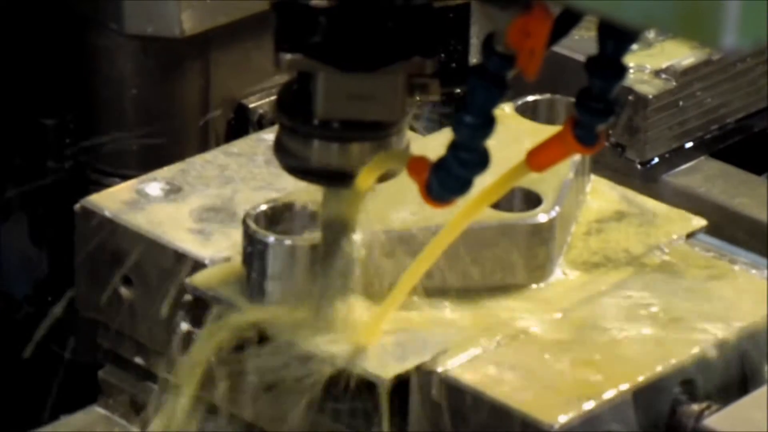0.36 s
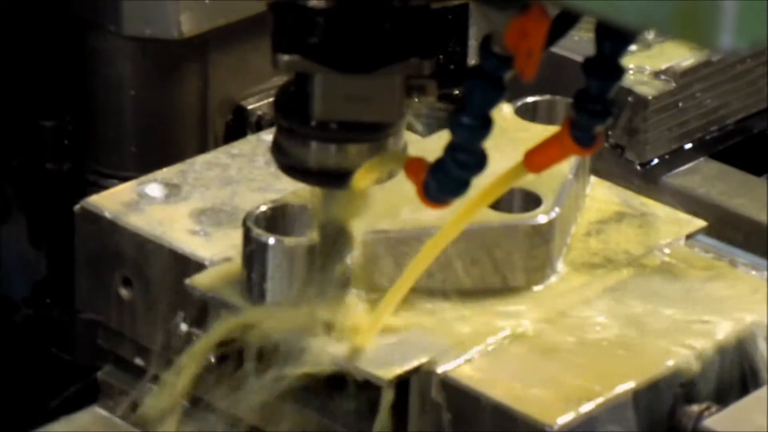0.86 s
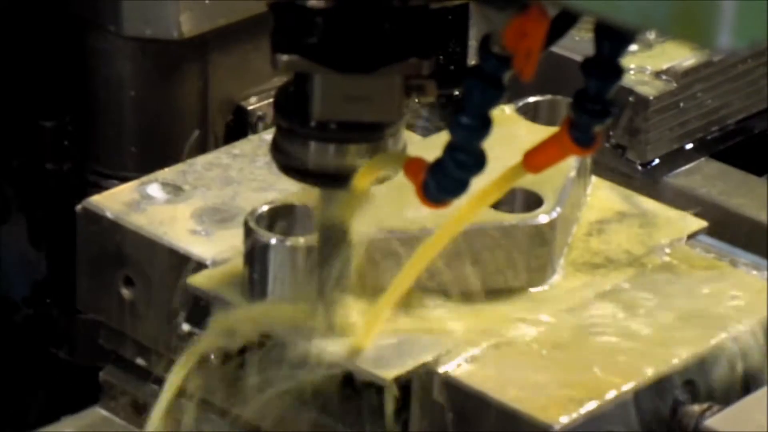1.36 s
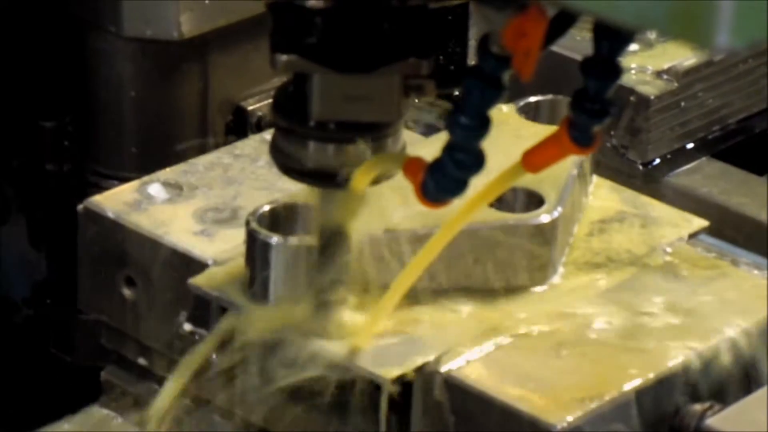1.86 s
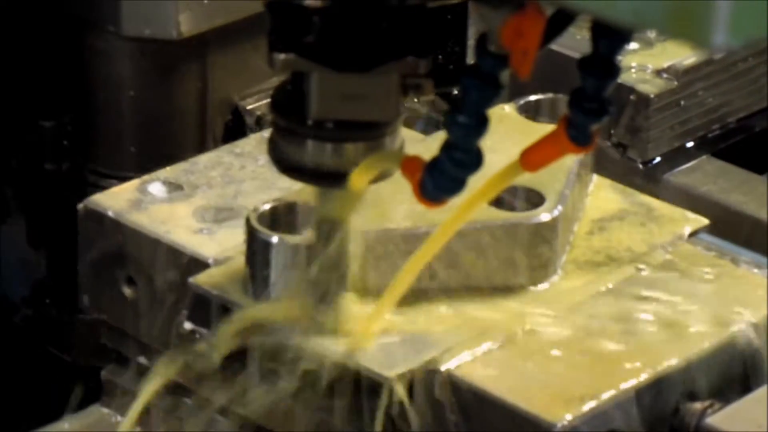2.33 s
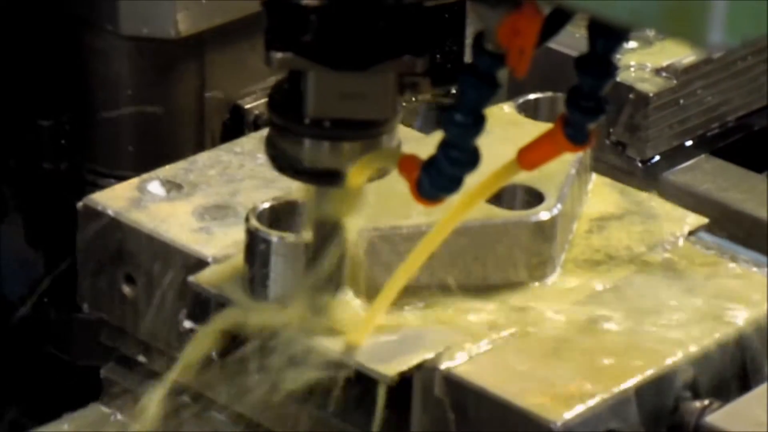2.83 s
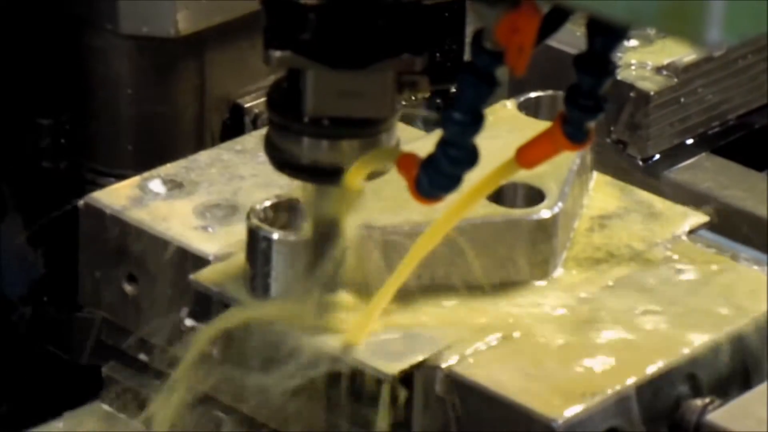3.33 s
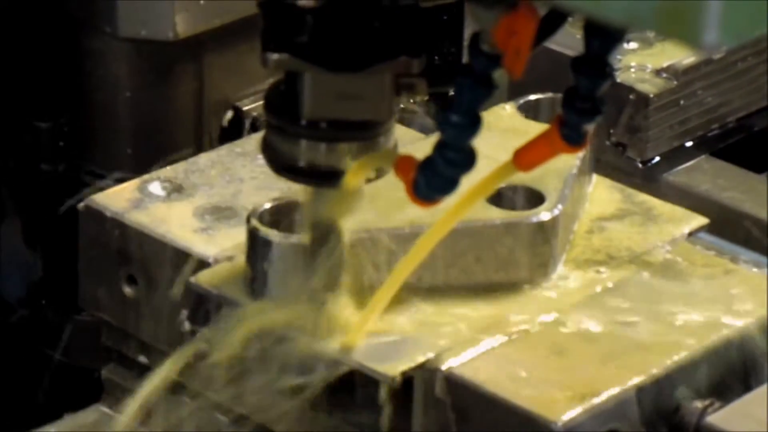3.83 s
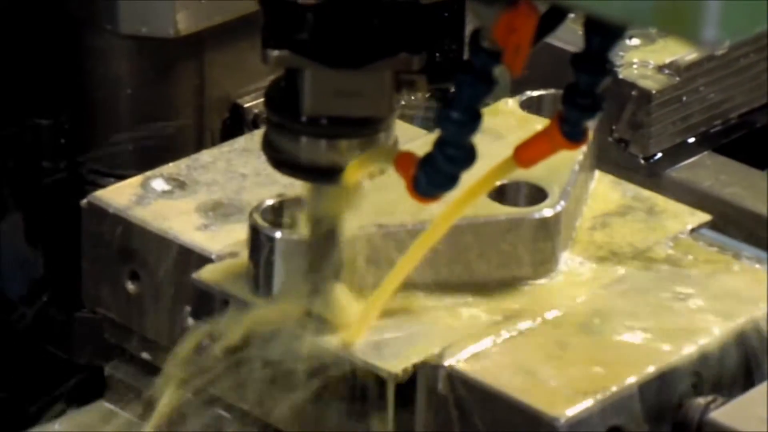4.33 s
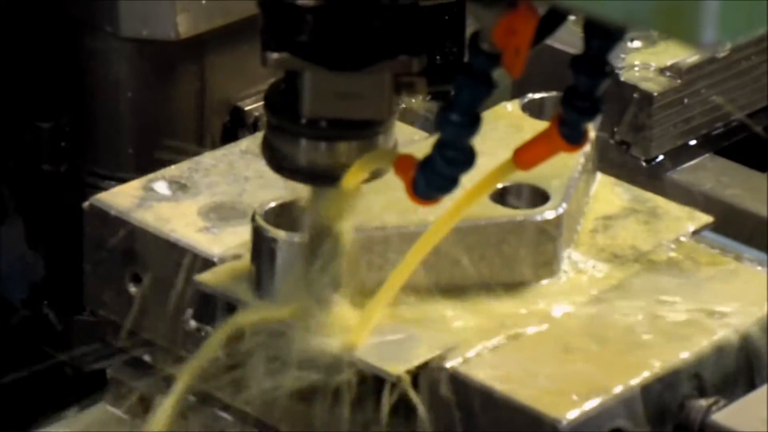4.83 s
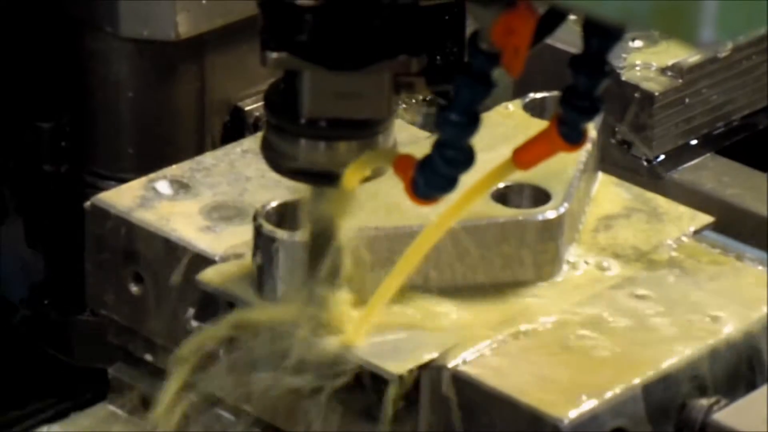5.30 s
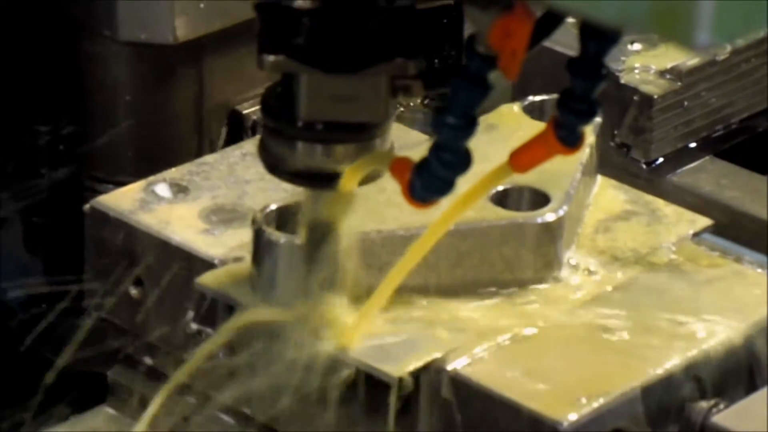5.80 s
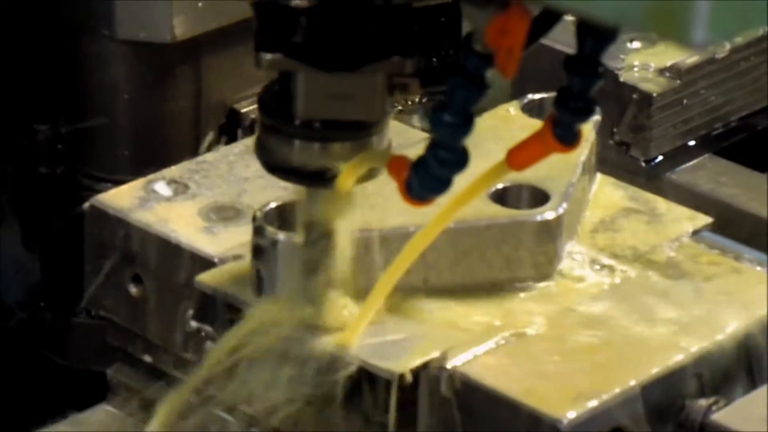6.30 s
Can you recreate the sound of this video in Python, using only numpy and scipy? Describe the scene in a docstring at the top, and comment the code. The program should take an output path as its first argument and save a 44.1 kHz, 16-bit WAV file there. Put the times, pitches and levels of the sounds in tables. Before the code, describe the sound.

From 0 s a milling machine is already in full cut, heard close in stereo through its open guard. A dense, bright coolant hiss, strongest around 7 to 9 kHz, spreads wide off sheet-metal walls, its colour shifting slowly. In the centre, spindle, pump and motor tones form a low hum and thin midrange whines near 1 kHz, over a broad mechanical whir. The cutter rings roughly between 900 and 1900 Hz, fluttering about 42 times a second with a weaker ten-per-second turn. Tiny metallic bites, each around a hundredth of a second, are crowded and strongest from 0.2 to 0.6 s, then scattered, with clearer ones near 1.6, 2.0, 2.85 and 4.4 s. Loudness creeps upward, slipping down a small step near 1.1, 2.1, 4.4 and 6.1 s. Around 5.7 s a faint short tone near 1070 Hz swells and fades; cutting continues to about 6.7 s.

```python
"""A four-flute cutter mills a metal block under a jet of coolant, heard through the machine's open guard.
From the start the spindle hums in multiples of its turn, pump and motors add steady tones, the turning
flutes ring the tool and fixture, the machine whirs, and coolant hisses off the sheet-metal walls.
Soon, and all the way through, single bites ring out; near the end a short tone rises and fades.
The whole level creeps up and now and then sinks a step."""
import sys
import numpy as np
from scipy import signal
from scipy.fft import rfft, irfft
from scipy.io import wavfile
from scipy.ndimage import uniform_filter1d

SR = 44100
rng = np.random.default_rng(int(sys.argv[2]) if len(sys.argv) > 2 else 0)


def how_loud(loudness_db):
    """Turn decibels into a plain amplitude multiplier (0 dB gives 1, 20 dB gives 10)."""
    steps = np.asarray(loudness_db, float) / 20
    return 10 ** steps


def output_pcm(signal):
    """Save a mono or channel-first signal as 16-bit PCM at the path in sys.argv[1].

    Samples are clipped to [-1, 1] before scaling.
    """
    pcm = np.clip(np.atleast_2d(signal).T, -1, 1) * 32767
    wavfile.write(sys.argv[1], SR, np.round(pcm).astype(np.int16))


N = 294147

TURNS_PER_S, FLUTES = 10.4035, 4
FIRST_BITE_TURNS = .2  # where a flute bites, in turns after the start

# tones locked to the spindle, before they waver: multiple_of_turn, rms_db
SPINDLE_TONES = [(7, -56), (8, -48), (10, -56), (12, -43), (14, -46), (16, -45), (20, -50), (22, -56),
                 (25, -56), (32, -52), (36, -57), (39, -55), (56, -55), (84, -47), (87, -52), (88, -42),
                 (90, -46), (91, -45), (92, -41), (93, -47), (109, -50), (132, -52), (144, -53), (147, -51)]
# steady tones of mains, pump and motors, before they waver: pitch_hz, rms_db
MOTOR_TONES = [(49.96, -55), (64.18, -50), (95.9, -55), (99.91, -52), (149.85, -51), (186.27, -50),
               (222.4, -50), (287.67, -52), (372.56, -51), (407.55, -52), (444.77, -48), (667.17, -51),
               (979.95, -41), (1021.5, -52)]
# ringing modes of tool and fixture; the cutting force rotates, so each is pushed hardest at its own angle:
# pitch_hz, width_hz, angle_turns, turn_swing_db, flute_swing_db, unevenness_db
TOOL_MODES = [(930, 110, .22, .6, 1.5, .3), (1447, 65, .42, 1.5, 2.5, .8), (1860, 90, .52, 2.2, 2.8, 1.8)]
# basic level of each tool mode, low to high: rms_db
RING_DB = (-35, -34.5, -35.5)
# how far each mode follows the load, low to high: share (no unit)
LOAD_FOLLOW = (1.4, 0.53, .8)
# slow change of each mode's ring from start to end, low to high: change_db
SLOW_CHANGE_DB = (1, -1.5, -2.5)
# how hard the tool is loaded: time_s, load_db
LOAD = [(0, 5), (.15, -3), (.7, 0.5), (1.3, 0), (1.8, 1.5), (2.4, -2), (3.0, 0.5), (3.4, 1), (3.8, -1.5),
        (4.4, -1), (4.8, -2), (5.4, -1), (5.85, 0.5), (6.2, -2), (6.67, -2)]
# place of each named tool mode in the tool table: mode_name, row (no unit)
MODE_ROW = {"low": 0, "middle": 1, "high": 2}
# single bites, timed at their peak: peak_s, peak_db, length_ms, mode_name
BITES = [(0.071, -26.5, 37, "middle"), (0.231, -16.5, 8.6, "high"), (0.344, -14, 12, "high"),
         (0.409, -21, 15, "high"), (0.457, -18, 7.8, "high"), (0.6, -21, 12, "high"),
         (0.733, -21, 13, "middle"), (0.838, -22, 8.4, "low"), (0.908, -27, 14, "middle"),
         (0.962, -22, 20, "high"), (1.031, -24, 15, "high"), (1.257, -23, 9, "high"),
         (1.512, -21, 10, "low"), (1.561, -23, 14, "high"), (1.585, -15, 7.5, "high"),
         (1.877, -23, 26, "high"), (1.947, -23.5, 13, "low"), (1.988, -17.5, 9, "high"),
         (2.634, -22, 12, "middle"), (2.85, -17, 5, "high"), (3.121, -22, 14, "high"),
         (3.291, -20, 17, "middle"), (3.296, -26, 30, "low"), (3.596, -24, 22, "middle"),
         (3.931, -24, 10, "low"), (4.301, -19, 14, "high"), (4.341, -21, 7, "high"),
         (4.375, -15.5, 10.5, "high"), (4.395, -22, 22, "middle"), (4.634, -23, 12, "low"),
         (4.759, -20, 13, "high"), (4.927, -25, 10, "low"), (5.318, -24, 28, "low"),
         (5.408, -21, 14, "low"), (5.614, -22, 17, "middle"), (5.81, -19, 9.2, "high"),
         (5.812, -25.5, 35, "middle"), (5.835, -20.5, 12, "low"), (5.937, -20, 8.1, "high"),
         (6.002, -24.5, 20, "high"), (6.195, -21, 12, "low")]
# broad shape of the machine's rumble and whir: pitch_hz, relative_db_per_hz
WHIR_SHAPE = [(15, -49), (25, -11), (134, -7.5), (345, -8.5), (438, -8), (525, -12.5), (655, -9.5),
              (800, -9), (939, -7.5), (1220, -7.5), (1430, -5.5), (1680, -6.5), (1850, -8), (2270, -15),
              (3000, -23), (3900, -49), (6600, -120)]
# small panel resonances on the whir: pitch_hz, width_hz, boost_db
PANELS = [(258, 30, 5), (575, 40, 5), (655, 35, 7), (750, 50, 4), (1060, 50, 3), (1140, 30, 4),
          (1220, 40, 4), (1300, 35, 6), (1575, 40, 3), (1650, 45, 5), (2030, 50, 3), (2160, 70, 3)]
# broad shape of the coolant hiss: pitch_hz, relative_db_per_hz
SPRAY_SHAPE = [(1200, -39), (1800, -8.5), (2300, -11.5), (2800, -9.5), (3300, -9), (4000, -5.5),
               (5000, -8.5), (5800, -8.5), (7000, -4.5), (8100, -0.5), (9200, -3.5), (10400, -9),
               (12000, -12), (14100, -15)]
# colours the walls give the hiss, shifting slowly from start to end:
# pitch_hz, width_hz, first_db, last_db, left_minus_right_db
WALLS = [(3060, 70, 4.5, 3.0, 0), (3540, 140, 4.0, 2.5, 0), (3890, 90, 1.5, 6.5, -1),
         (4120, 90, 6.0, 2.5, 0), (4480, 80, 4.0, 1.0, 1), (4620, 60, 6.0, 3.0, 1), (4750, 40, 4.5, 2.0, 1),
         (4970, 60, 5.0, 3.5, -1), (5430, 140, 2.5, 2.5, -1), (5850, 50, 0.5, 5.5, 1),
         (6070, 50, 3.5, 2.0, 2), (6220, 50, 2.0, 6.0, 1), (6380, 80, 1.5, 7.5, -1),
         (6680, 40, 2.5, 3.5, 2), (6760, 40, 2.5, 4.0, 1), (7100, 40, 1.0, 2.5, -6),
         (7220, 140, 0.5, 5.0, 0), (7500, 60, 1.5, 3.0, -4), (7750, 140, 4.0, 6.0, -1),
         (7980, 80, 2.5, 5.5, -2), (8310, 140, 6.5, 4.5, 4), (8670, 50, 3.5, 0.0, 0),
         (9070, 40, 0.0, 3.0, -2), (9230, 70, 6.0, 2.0, -1), (9780, 50, 3.5, 1.5, -3),
         (9910, 40, 1.0, 7.0, -1), (10010, 70, 2.0, 7.5, 5), (10480, 110, 5.0, 4.0, 0),
         (10900, 120, 6.0, 2.5, 0), (11160, 80, 3.5, 3.5, 0)]
# how alike left and right noise are: pitch_hz, likeness (0 to 1)
LIKENESS = [(60, .99), (1000, 1), (3700, .97), (3950, .66), (4150, .72), (4350, .96), (5000, .9),
            (5250, .5), (5900, .58), (6500, .75), (8500, .7), (9500, .45), (11000, .4), (12000, .15),
            (14500, .15)]
# which side of the noise is louder: pitch_hz, left_minus_right_db
SIDE_LEAN = [(100, 1), (400, -1), (3300, 0), (4000, -1.8), (5800, -.2), (7000, 2.5), (9200, 5),
             (10400, 2.5), (14100, 2.5)]
# how far the left noise leads the right: pitch_hz, lead_radians
LEFT_LEAD = [(0, -.06), (3620, .05), (4130, -.05), (4950, 0), (5300, .3), (6500, .5), (7400, .05),
             (8100, .6), (8800, -.2), (9350, .4), (10000, -.55), (10900, 0), (11500, -.5), (14600, 0)]
# quick changes of the overall level: start_s, step_db
LEVEL_STEPS = [(1.055, -1.46), (2.13, -1.5), (4.4, -1.6), (6.09, -1.96)]


def evened(x):
    """Scales a sound or control curve to an rms of 1."""
    return x / np.sqrt(np.mean(np.abs(x) ** 2) + 1e-20)


def read(points, hz):
    """Reads a table of values by pitch, in straight lines on a log pitch axis."""
    f, value = np.transpose(points)
    return np.interp(np.log(hz + 1), np.log(f + 1), value)


def drift(top_hz, count):
    """Slow random curves, one per row, with an rms of 1 over all rows."""
    z = rfft(rng.standard_normal((count, N)))
    hz = np.arange(z.shape[1]) * SR / N
    return evened(irfft(z / (1 + (hz / top_hz) ** 2), N))


def resonate(x, hz, width):
    """A resonance: shifts its pitch down to zero, smooths, and shifts back."""
    turn = np.exp(2j * np.pi * hz * np.arange(len(x)) / SR)
    r = np.exp(-np.pi * width / SR)
    return 2 * (turn * signal.lfilter([1 - r], [1, -r], x / turn)).real


def bump(hz, centre_hz, width_hz):
    """A flat-topped resonance shape, half high at the edges of its width."""
    return 1 / (1 + (2 * (hz - centre_hz) / width_hz) ** 4)


def patches(bins, frames, wide, long):
    """Random patches over pitch and time, smoothed over so many bins and frames, rms 1."""
    grain = rng.standard_normal((frames, bins)).T
    return evened(uniform_filter1d(uniform_filter1d(grain, wide, axis=0), long, axis=1))


def noise(left_db, right_db, size):
    """Two related noise channels from random short spectra, with given levels by pitch bin and frame."""
    hz = np.fft.rfftfreq(size, 1 / SR)[:, None]
    a, b, c, d = rng.standard_normal(left_db.shape[::-1] + (4,)).T
    same = np.clip(read(LIKENESS, hz), -1, 1)
    left = a + 1j * b
    shared = same * left * np.exp(-1j * read(LEFT_LEAD, hz))
    right = shared + np.sqrt(1 - same ** 2) * (c + 1j * d)
    lean = read(SIDE_LEAN, hz) / 2
    z = np.array([left * how_loud(left_db + lean), right * how_loud(right_db - lean)])
    both = signal.istft(z, nperseg=size, noverlap=size * 3 // 4)[1][:, :N]
    return both / np.sqrt(np.mean(both.mean(0) ** 2))  # the mean of both channels gets rms 1


def tones(scatter_cycles=0.1, waver_rms_db=1.1):
    """Spindle multiples start nearly together at a bite; motors run free. All waver a little in level."""
    t, out = np.arange(N) / SR, np.zeros(N)
    turns = TURNS_PER_S * t - FIRST_BITE_TURNS
    waver_db = waver_rms_db * drift(1.7, count=6)
    for k, (multiple, db) in enumerate(SPINDLE_TONES):
        # the low hum peaks a third of a flute early; multiples between the flutes' own sit a quarter cycle aside
        low = multiple < 40
        start = low * (multiple / (3 * FLUTES) + (multiple % FLUTES > 0) / 4)
        cycles = multiple * turns + start + scatter_cycles * rng.standard_normal()
        out += how_loud(db + waver_db[k % 6]) * np.cos(2 * np.pi * cycles)
    for k, (hz, db) in enumerate(MOTOR_TONES):
        out += how_loud(db + waver_db[k % 6]) * np.cos(2 * np.pi * (hz * t + rng.random()))
    return np.sqrt(2) * out  # turns rms into peak


def cutter(wander_rms_db=1.1, wander_hz=2.5):
    """Scraping noise, swelling with every flute and once a turn with the run-out, rings the tool modes."""
    t, out = np.arange(N) / SR, np.zeros(N)
    load_db = np.interp(t, *np.transpose(LOAD))
    uneven = drift(25, count=len(TOOL_MODES))
    # each mode also swells and sinks on its own
    wander_db = wander_rms_db * drift(wander_hz, count=len(TOOL_MODES))
    for k, (hz, width, angle, turn_db, flute_db, uneven_db) in enumerate(TOOL_MODES):
        turn = 2 * np.pi * (TURNS_PER_S * t - angle)
        push_db = turn_db * np.cos(turn) + flute_db * np.cos(FLUTES * turn)
        scrape = how_loud(push_db + uneven_db * uneven[k]) * rng.standard_normal(N)
        ring = resonate(resonate(scrape, hz, width), hz, 2 * width)
        slow_db = SLOW_CHANGE_DB[k] * (t / t[-1] - .5)
        level_db = RING_DB[k] + LOAD_FOLLOW[k] * load_db + slow_db + wander_db[k]
        out += how_loud(level_db) * evened(ring)
    return out


def whir(level_db=-30, throb_db=0.48, patchy_db=1.14, side_uneven_db=4.2, side_db=-0.5):
    """Broad machine noise with a few panel resonances, throbbing faintly with the flutes."""
    hz, frames = np.fft.rfftfreq(4096, 1 / SR), N // 1024 + 5
    shape = read(WHIR_SHAPE, hz) + sum(db * bump(hz, f, w) for f, w, db in PANELS)
    spectrum_db = shape[:, None] + patchy_db * patches(len(hz), frames, wide=20, long=5)
    turns = TURNS_PER_S * np.arange(N) / SR - FIRST_BITE_TURNS
    throb = throb_db * np.cos(2 * np.pi * FLUTES * turns)
    left, right = how_loud(level_db + throb) * noise(spectrum_db, spectrum_db, size=4096)
    # the left-right difference is heard to swell and sink unevenly
    mid = (left + right) / 2
    side = (left - right) / 2 * how_loud(side_uneven_db * drift(9, count=1)[0] + side_db)
    return np.array([mid + side, mid - side])


def spray(level_db=-18.5, patchy_db=0.57, comb_db=1.9, flicker_db=0.06, turn_db=.35):
    """Dense splash hiss, coloured by the walls; the spinning tool throws it once a turn."""
    hz, frames = np.fft.rfftfreq(4096, 1 / SR), N // 1024 + 5
    progress = np.linspace(0, 1, frames)
    f, w, first_db, last_db, side_db = np.transpose(WALLS)
    bumps = bump(hz[:, None], f, w)
    wall_db = bumps @ (first_db[:, None] + np.outer(last_db - first_db, progress))
    spectrum_db = read(SPRAY_SHAPE, hz)[:, None] + wall_db
    spectrum_db += patchy_db * patches(len(hz), frames, wide=40, long=4)
    # many reflections leave a fine comb that changes slowly
    spectrum_db += comb_db * patches(len(hz), frames, wide=3, long=250)
    side = (bumps @ side_db)[:, None] / 2
    flow_db = level_db + turn_db * np.cos(2 * np.pi * TURNS_PER_S * np.arange(N) / SR)
    flow_db = flow_db + flicker_db * drift(30, count=1)
    return how_loud(flow_db) * noise(spectrum_db + side, spectrum_db - side, size=4096)


def side_blur(x, level_db=-28, length_s=.02):
    """A faint random left-right difference: the sound smeared by short noise, opposite in sign each side."""
    taps = rng.standard_normal(round(length_s * SR))
    blur = signal.oaconvolve(x, taps / np.linalg.norm(taps))[:N]
    return how_loud(level_db) * blur * np.array([[1], [-1]])


def soft_bites(share=.22, level_db=-26, spread_db=3.5, middle_ms=14):
    """Some flutes, drawn by lot, dig in a little, more strongly under load; rows like the bite table."""
    flute = np.arange(1, int(N / SR * TURNS_PER_S * FLUTES))
    s = (flute / FLUTES + FIRST_BITE_TURNS) / TURNS_PER_S
    lot, size, length, mode = rng.random((len(s), 4)).T
    db = level_db + spread_db * (2 * size - 1) + np.interp(s, *np.transpose(LOAD))
    names = np.array(list(MODE_ROW))[(mode * len(MODE_ROW)).astype(int)]
    rows = zip(s, db, middle_ms * (.5 + length), names)
    return [row for row, draw in zip(rows, lot) if draw < share]


def bites(detune=.018):
    """A flute digs in and one tool mode, slightly off its pitch, rings up and dies away quickly."""
    out, rows = np.zeros(N), BITES + soft_bites()
    for (s, db, ms, mode), (phase, off) in zip(rows, rng.random((len(rows), 2))):
        hz = TOOL_MODES[MODE_ROW[mode]][0] * (1 + detune * (2 * off - 1))
        t = np.arange(-2 * ms, 2 * ms, 1000 / SR) / 1000
        swell = np.exp(-np.log(2) * (2000 * t / ms) ** 2)  # above half height for the given length
        ring = how_loud(db) * swell * np.cos(2 * np.pi * (hz * t + phase))
        at = round((s + t[0]) * SR)
        part = out[max(at, 0):at + len(t)]
        part += ring[max(-at, 0):][:len(part)]
    return out


def moan(middle_s=5.72, length_s=.22, hz=1071, db=-35):
    """A short tone, slightly wavering in pitch, rises out of the cut and fades."""
    swell = np.exp(-((np.arange(N) / SR - middle_s) / length_s * 2) ** 2)
    cycles = np.cumsum(hz + 5 * drift(12, count=1)[0]) / SR
    return how_loud(db) * swell * np.sqrt(2) * np.cos(2 * np.pi * cycles)


def creep_db(climb_db_per_s=0.98, step_s=0.056):
    """Overall level: a slow climb broken by quick steps down, averaging 0 dB."""
    t = np.arange(N) / SR
    db = climb_db_per_s * t
    db = db + sum(step_db * np.clip((t - s) / step_s, 0, 1) for s, step_db in LEVEL_STEPS)
    return db - db.mean()


def scene():
    """Tones and cutting sounds are almost alike left and right, leaning a little right; noises are wider."""
    steady = tones()
    cut = cutter() + bites() + moan()
    placed = steady * how_loud(np.array([[-.2], [.2]])) + cut * how_loud(np.array([[-.4], [.4]]))
    return placed + side_blur(steady + cut) + whir() + spray()


def top_cut(x):
    """Nothing passes above the cut-off."""
    return signal.sosfilt(signal.butter(12, 15060, fs=SR, output="sos"), x)


def record(dry):
    """Applies the creeping level, then a steep low-pass that limits the treble."""
    edge_hz = 14190
    edge = signal.firwin(1023, edge_hz, window=("kaiser", 9), fs=SR)
    mix = signal.oaconvolve(dry * how_loud(creep_db()), edge[None], "same")
    return top_cut(mix)


dry = scene()
out = record(dry)
output_pcm(out)
```